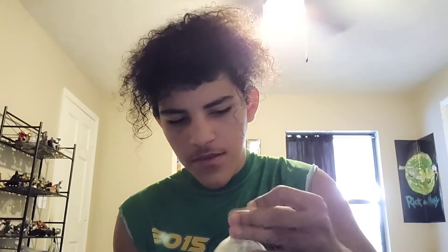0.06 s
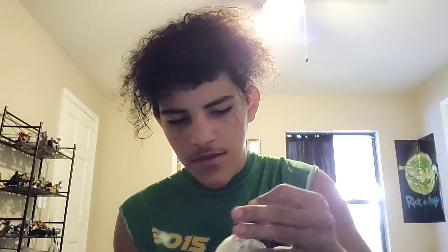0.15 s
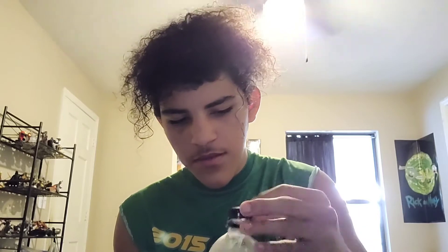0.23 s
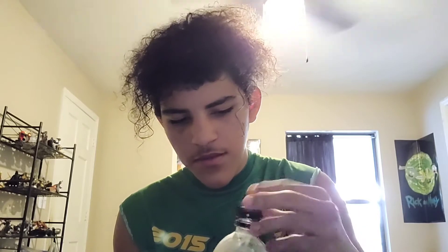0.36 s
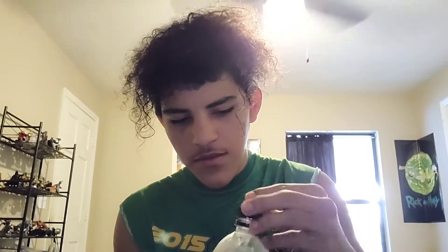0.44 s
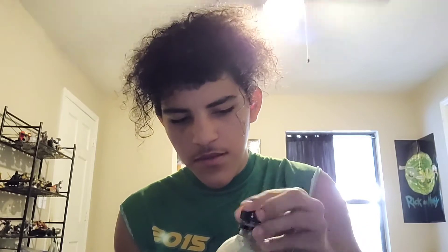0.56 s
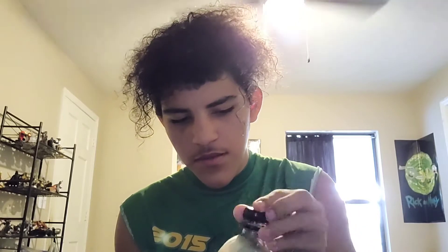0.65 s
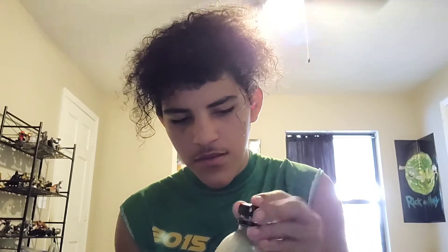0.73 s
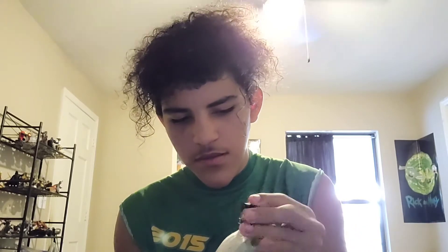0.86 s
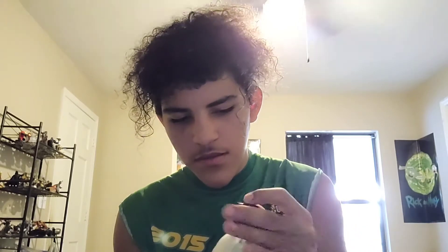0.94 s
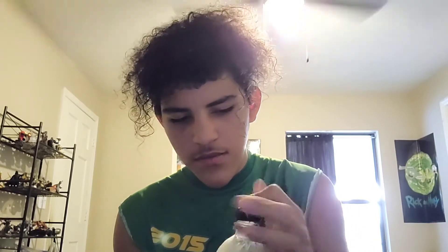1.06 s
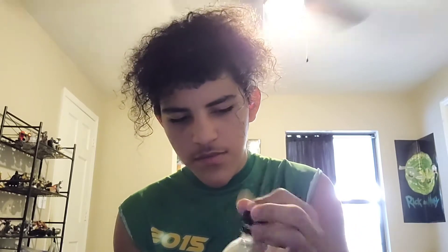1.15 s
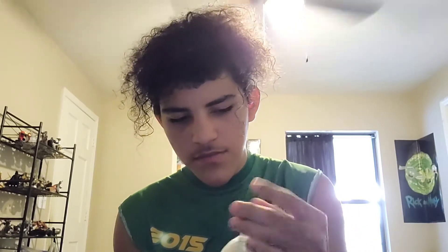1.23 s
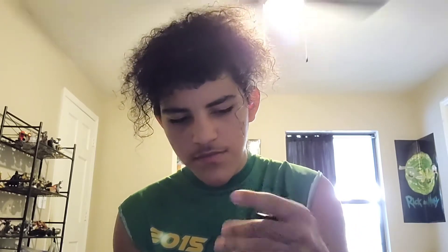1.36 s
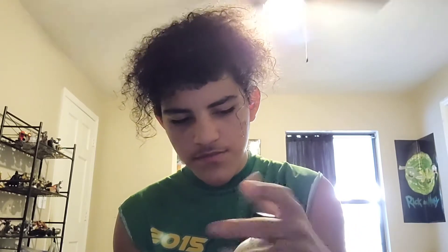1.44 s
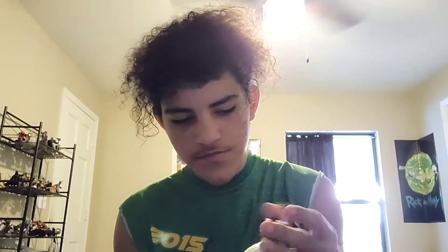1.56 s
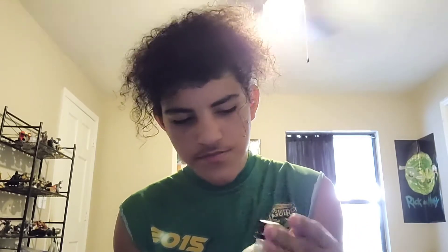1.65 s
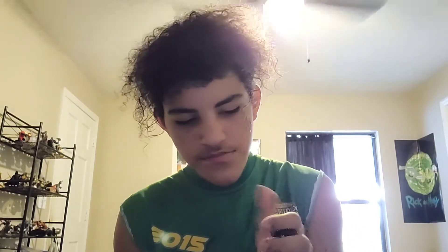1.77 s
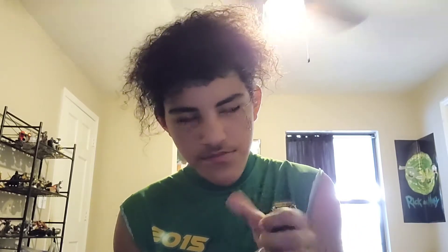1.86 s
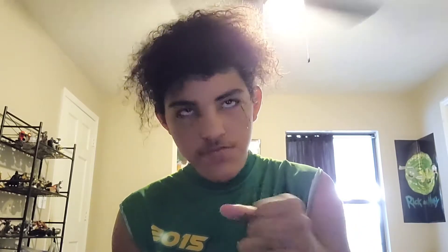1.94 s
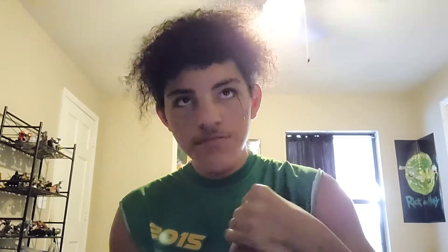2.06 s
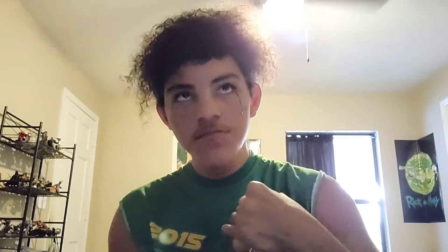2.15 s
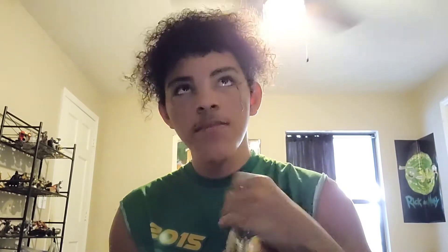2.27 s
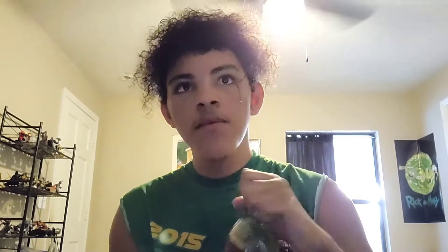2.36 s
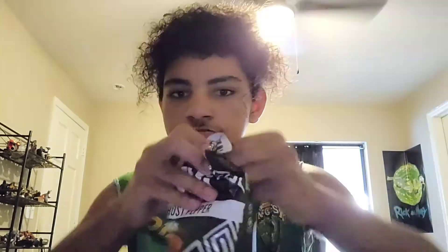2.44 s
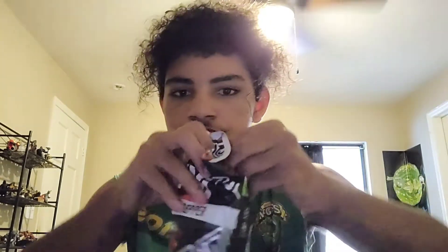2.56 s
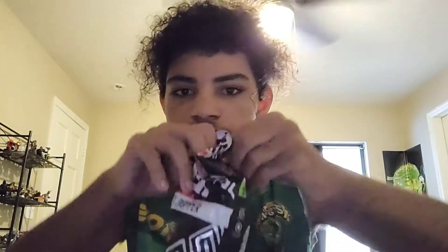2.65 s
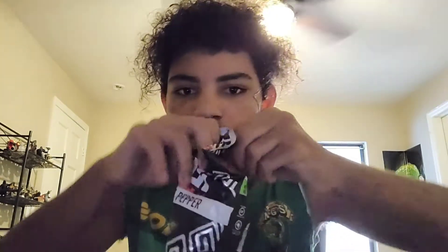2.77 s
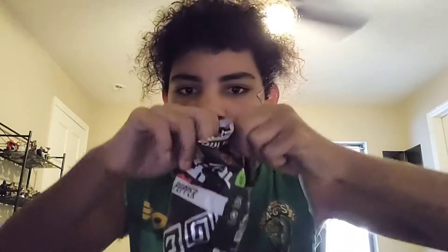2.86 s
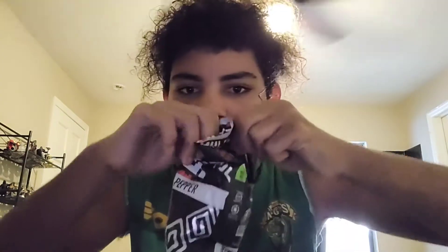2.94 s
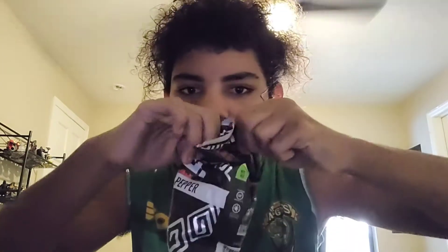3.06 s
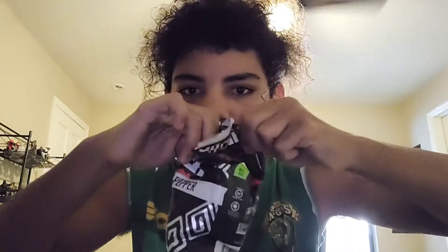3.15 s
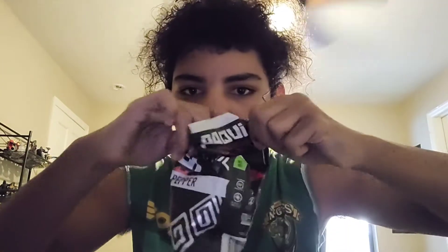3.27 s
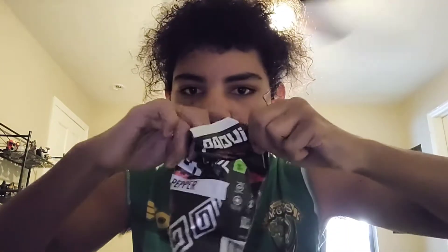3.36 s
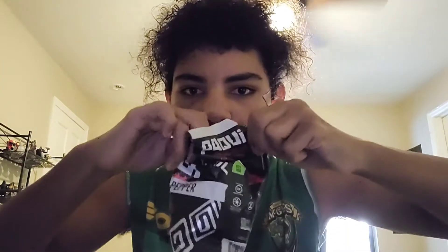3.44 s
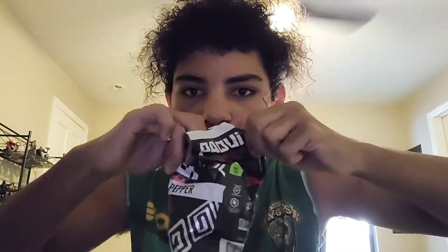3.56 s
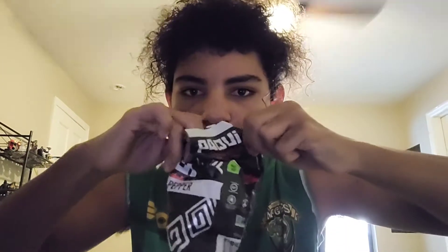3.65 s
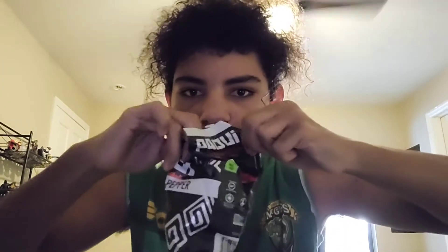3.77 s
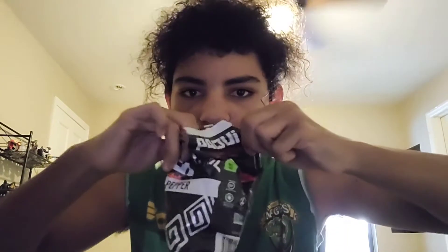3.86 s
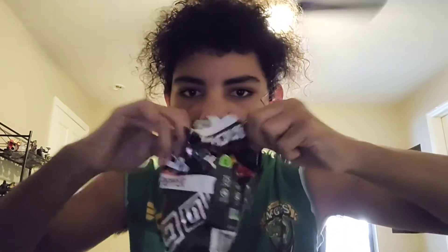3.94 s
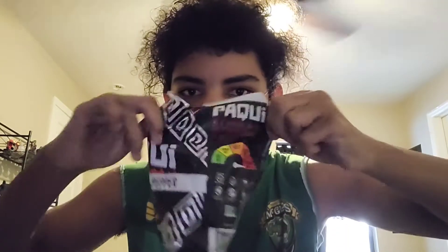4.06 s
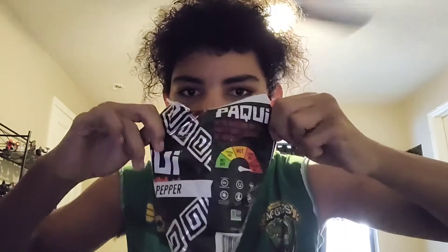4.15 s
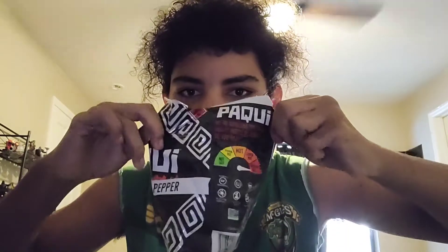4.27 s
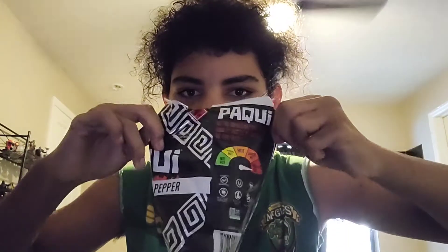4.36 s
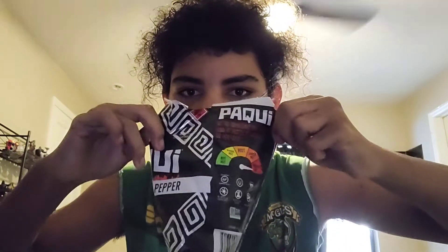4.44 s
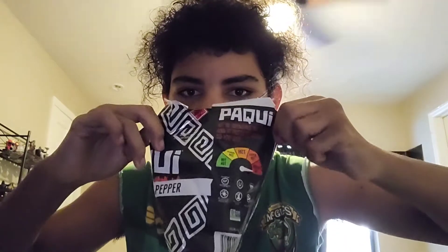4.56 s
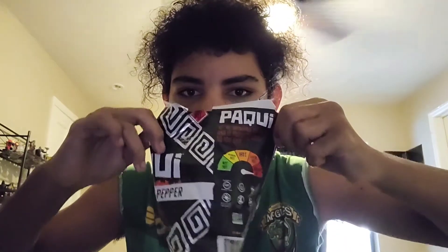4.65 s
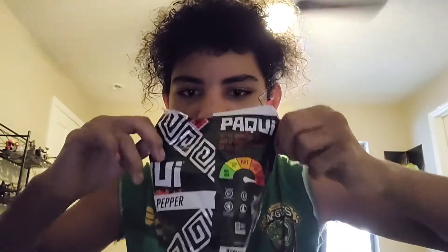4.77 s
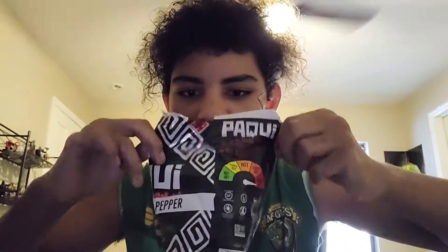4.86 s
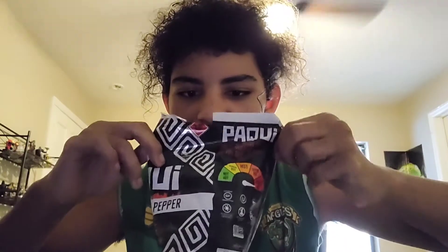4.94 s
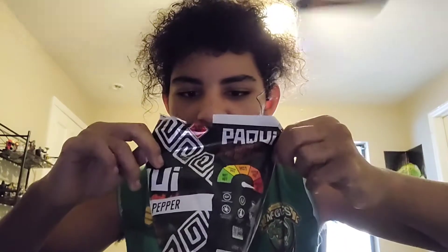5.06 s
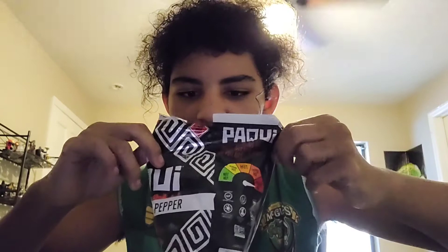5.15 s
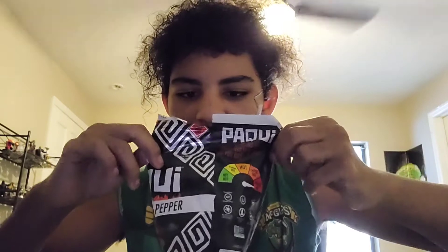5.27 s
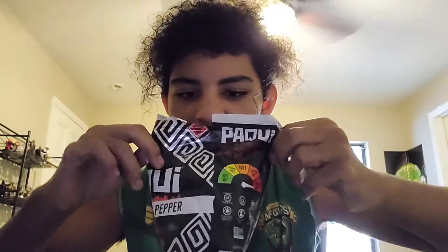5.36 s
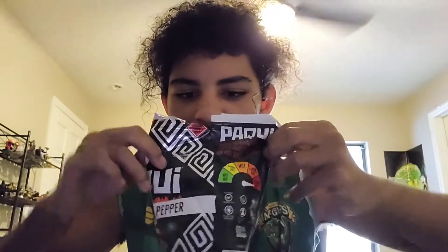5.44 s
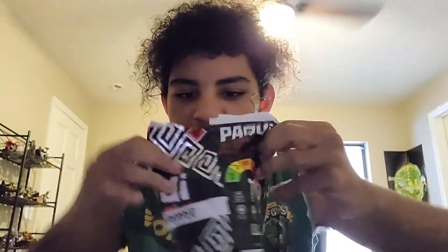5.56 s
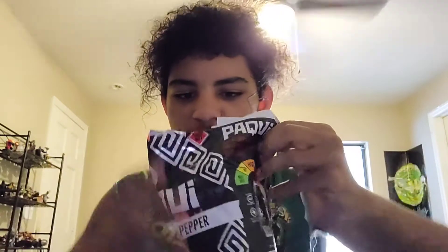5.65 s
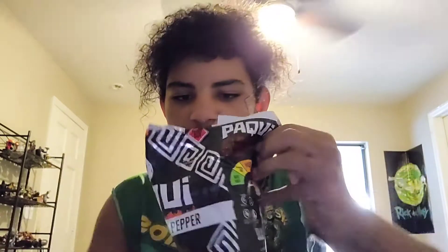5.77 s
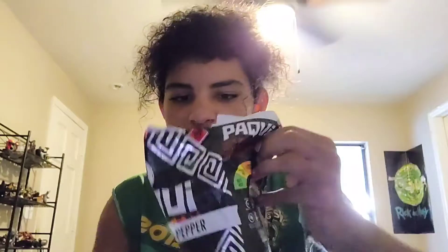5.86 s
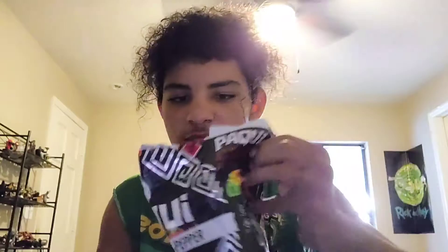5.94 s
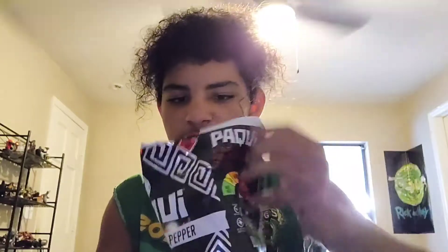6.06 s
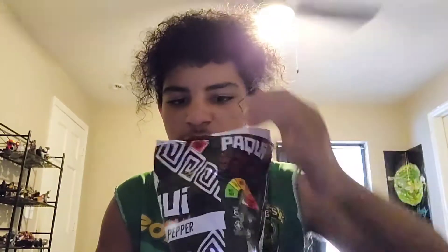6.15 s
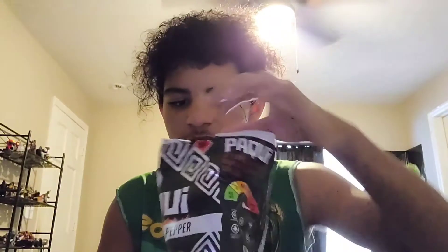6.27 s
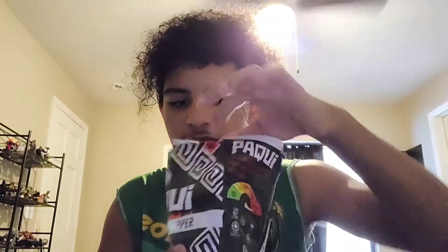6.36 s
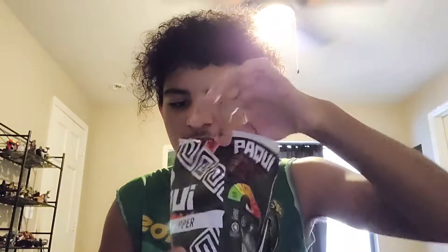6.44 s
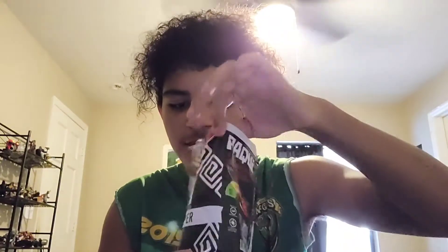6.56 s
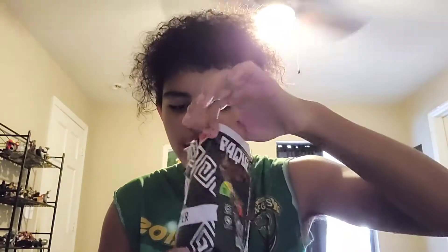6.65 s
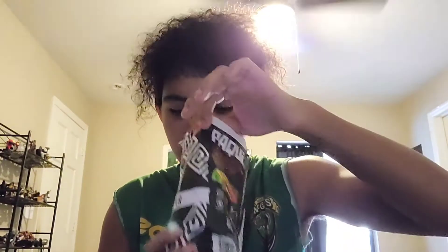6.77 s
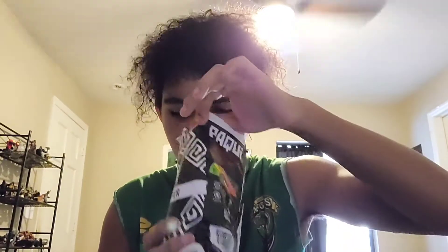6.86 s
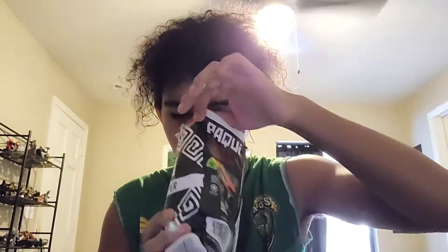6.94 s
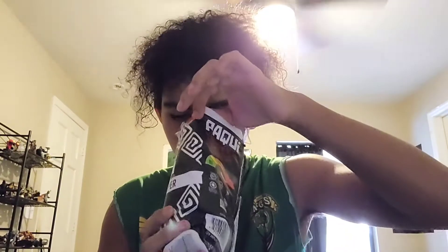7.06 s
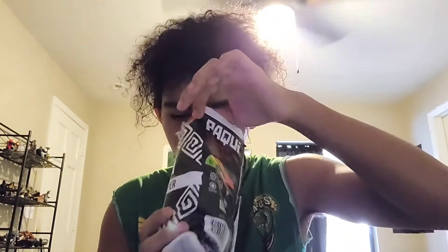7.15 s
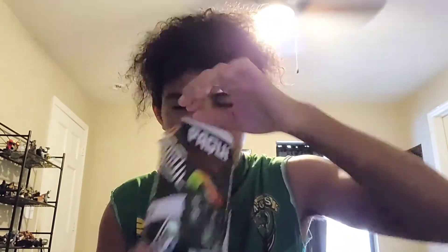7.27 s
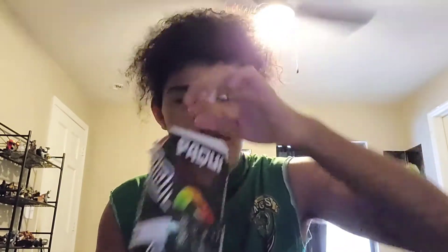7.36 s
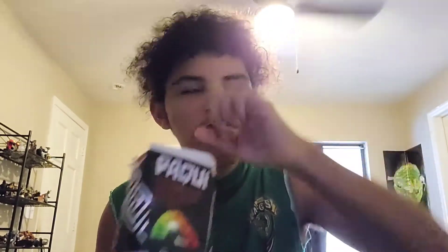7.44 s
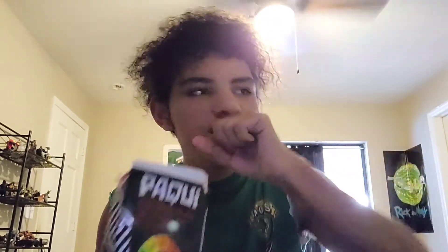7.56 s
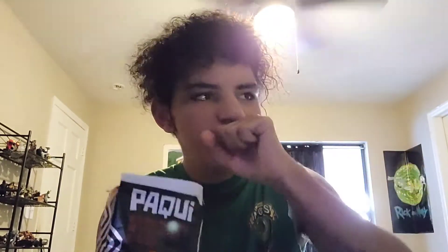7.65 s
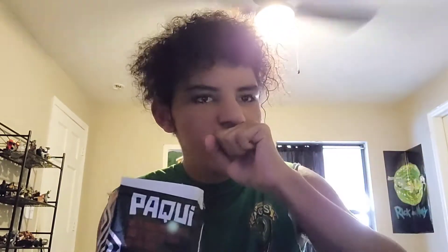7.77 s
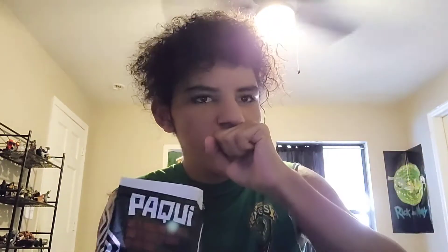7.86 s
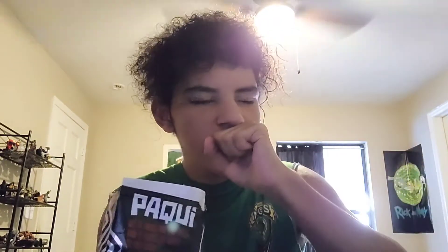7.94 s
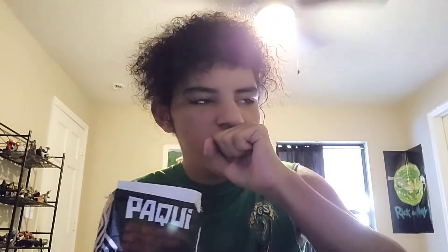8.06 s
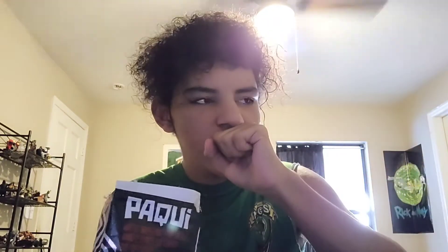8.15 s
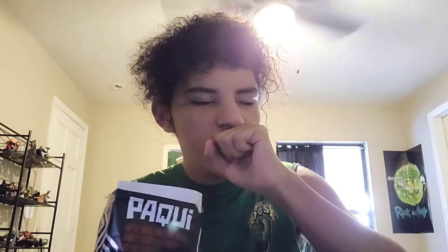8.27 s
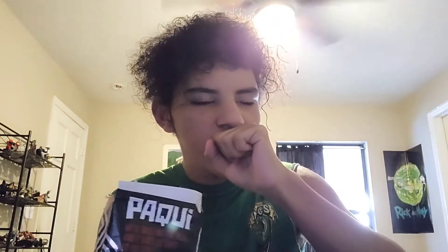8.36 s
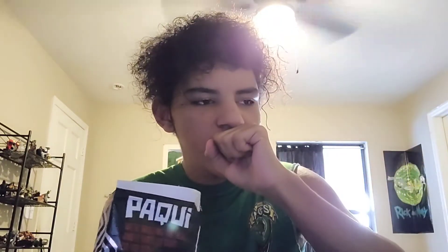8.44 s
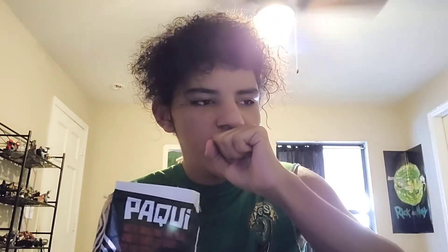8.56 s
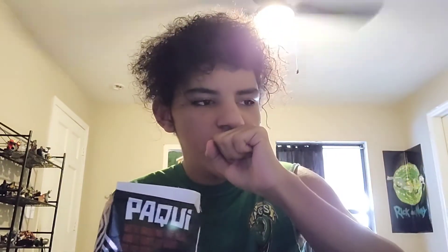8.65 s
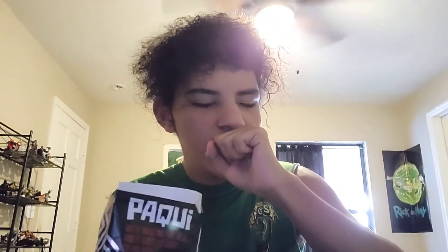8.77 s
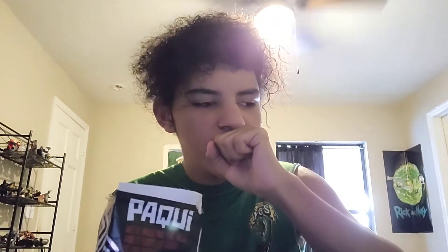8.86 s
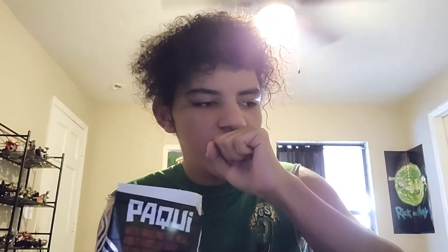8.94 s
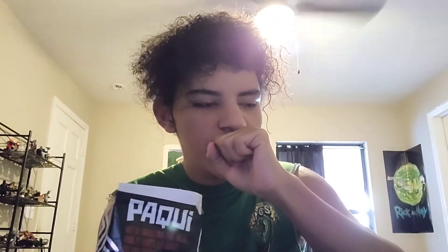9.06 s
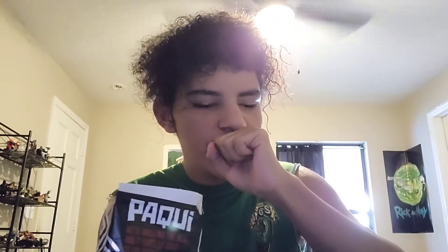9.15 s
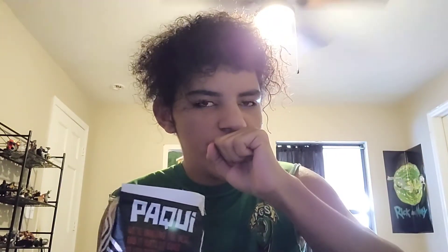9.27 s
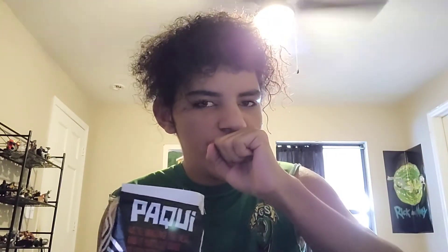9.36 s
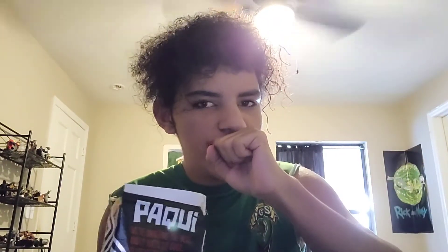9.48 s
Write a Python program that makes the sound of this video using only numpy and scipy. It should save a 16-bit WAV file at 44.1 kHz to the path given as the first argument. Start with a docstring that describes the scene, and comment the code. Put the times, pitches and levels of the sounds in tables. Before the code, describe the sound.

A close stereo pickup in a small bedroom, with short reflections and a quiet, steady ceiling fan whose low hum swells now and then. From 0 to 1.2 seconds come faint finger scuffs and small plastic ticks on a bottle. They strengthen from 1.2 to 1.65, with two sharper clacks near 1.55 and 1.65, then dull soft bumps at about 1.75 and 2.1. At 2.5 a stiff foil bag is gripped: dense, crisp crackles and snapping creases until 3.3. After a short lull with a few snaps, it is pulled open, loudest from 3.95 to 4.2, trailing off by 4.5. Sparse ticks follow, then moderate crinkling from 5.4 to 6.2 and a bright burst around 6.5 as a hand reaches in, easing by 6.9. After 7.2 there is almost only fan air, with isolated tiny film ticks near 8.2 and 9.4.

```python
"""Stiff snack bag opened close to the microphones

A small bottle is handled and put away; then a stiff foil snack bag is gripped, pulled open and rummaged in,
close to a pair of built-in microphones in a bedroom. Creases in the film snap through one by one as clicks with
a brief noisy flutter, over a crinkle of tiny random clicks that follows the hands. The bottle ticks, scuffs and
bumps; behind it all lie reflections of the room and a ceiling fan: shaped noise with a narrow, swelling hum."""
import sys
import numpy as np
from scipy import signal
from scipy.fft import rfft, irfft, next_fast_len
from scipy.io import wavfile
from scipy.ndimage import uniform_filter1d

SR = 44100
rng = np.random.default_rng(int(sys.argv[2]) if len(sys.argv) > 2 else 0)


def file_out(sig):
    """Save sig as 16-bit WAV at sys.argv[1]."""
    # one column per channel
    cols = np.atleast_2d(sig).T
    # limit, then scale
    lim = np.clip(cols, -1, 1)
    pcm = np.round(lim * 32767).astype(np.int16)
    wavfile.write(sys.argv[1], SR, pcm)


N = 419391
LEAD = 400   # samples of creak before a crease gives way
OPPOSITE = np.array([[1], [-1]])   # left and right in opposite sense


def bag():
    """Big creases snap over lesser ones and a crinkle that is louder, its grains denser, the harder the work."""
    # moves of the hands: gripping, tugging at the seal, opening, holding, turning, reaching in, drawing out
    # peak_s, level_db (middle register, before the trim below), rise_s, fall_s,
    # body_db and treble_db (re level)
    moves = [(2.64, -39, 0.12, 0.059, 4.5, -4.5), (2.72, -36, 0.09, 0.12, 0.5, -5),
             (2.899, -49.5, 0.25, 0.23, 12, -1.5), (3.15, -49.5, 0.34, .2, 8.5, -14),
             (3.255, -33, 0.099, 0.049, 4.5, -1.5), (3.53, -52, 0.015, 0.11, -3.5, -14),
             (4.041, -27.5, 0.13, .085, 5.5, -5.5), (4.195, -36.5, 0.023, 0.061, 3.5, -3),
             (4.37, -58, 0.046, .2, 6, -6), (4.73, -69.5, 0.44, 0.55, 12.5, -4),
             (4.899, -45.5, .07, 0.053, 6, -7), (5.522, -36, .03, 0.079, 0, -12),
             (5.579, -41, 0.078, 0.078, 7.5, -4), (5.869, -48, .06, 0.54, 5.5, -9),
             (6.1, -37, 0.26, 0.095, 4, -5.5), (6.411, -51, 0.067, 0.057, 8.5, -11),
             (6.505, -31.5, .035, 0.09, 5, -5.5), (6.71, -52, 0.21, 0.09, 6.5, -11),
             (6.79, -43.5, 0.034, 0.061, -1, -10), (6.9, -67, 0.15, 0.57, 9, 0)]
    # the loudest creases snapping through: start_s, level_db (middle register, before the bass cut and trim),
    # body_db and treble_db (re level)
    big_creases = [(2.5376, -39.5, 1.5, -9), (2.6024, -33, -15, -17), (2.6184, -37.5, 9, 1),
                   (2.6394, -36.5, -14, 6.5), (2.6796, -38, -24, 8.5), (2.7105, -30.5, -2, 4.5),
                   (2.7334, -35, 6, 0), (2.7766, -26.5, -8.5, -9), (2.836, -31.5, -6.5, -9),
                   (2.8915, -33, 0.5, -4.5), (2.9191, -35.5, 5.5, -9), (2.987, -41.5, -21, 9),
                   (3.0102, -37, -5, 3), (3.0445, -28, 3, -10.5), (3.0666, -40, 4, -14),
                   (3.1337, -34.5, -1, -4.5), (3.2276, -30, 11, -6), (3.2528, -25.5, 2.5, -11),
                   (3.2625, -32, 4, 3), (3.2776, -28, -6, -1.5), (3.4146, -56.5, 16, 0),
                   (3.5153, -31, -7, -4), (3.6242, -68.5, 20, -15), (3.799, -49, 11.5, -33),
                   (3.839, -30.5, 8, 4.5), (3.8841, -39.5, 4.5, -3), (3.9465, -20.5, -6, -6),
                   (3.9796, -36, 10, -3), (3.9967, -34, 5, 2), (4.0243, -34.5, 15.5, 4),
                   (4.0431, -35, 6, 6), (4.0826, -25.5, 0, -4.5), (4.1293, -33, 4.5, -5),
                   (4.174, -42.5, 4, 2), (4.1948, -30.5, 4.5, -11), (4.2213, -38.5, 0, -8),
                   (4.2553, -41.5, -2, -21), (4.2872, -48.5, 8.5, -18), (4.3239, -47, 2, -16),
                   (4.3542, -34, 8, -12), (4.4185, -49.5, 3.5, -10), (4.45, -52.5, 2, -25),
                   (4.5725, -72.5, 27.5, 5), (4.6986, -64.5, 17, -10), (4.8312, -55.5, 0, 4.5),
                   (4.8528, -42.5, 1, -10), (4.8963, -37, 12, 6), (4.9154, -46, 16, -8),
                   (4.9861, -47, -14, -7), (5.0014, -52.5, 9.5, -13), (5.165, -57, 13.5, -1),
                   (5.2688, -47.5, -3.5, -7), (5.3929, -49.5, -4, -15), (5.403, -50.5, -2, -4.5),
                   (5.4412, -45, -3.5, -1), (5.5116, -44.5, 7, -3), (5.5517, -43, 9, 1.5),
                   (5.585, -40, 10.5, 4), (5.642, -40, -8, -3), (5.6882, -37, 0.5, 0.5),
                   (5.8201, -48.5, 2, -28), (5.8438, -36.5, 5, -8), (5.8867, -33.5, -2, -3),
                   (5.9308, -35, -12, -34), (6.0591, -37, -15, 0.5), (6.1052, -38.5, 6, 5),
                   (6.3119, -56, 8, -13), (6.412, -42, 9, -5), (6.4402, -34.5, 1, -2.5),
                   (6.494, -25.5, 1, -9.5), (6.5169, -31.5, 9.5, -2), (6.5599, -39, 12, -2.5),
                   (6.6893, -43.5, 1, -34), (6.7045, -47, -5, -18), (6.7268, -44.5, 8.5, -20),
                   (6.7825, -38.5, 8.5, -3), (6.8824, -55.5, 11.5, 1.5), (6.9185, -51, 11.5, -28.5),
                   (7.2097, -46, 10, -7), (7.6909, -71, -0.5, 7), (8.18, -56.5, -4, -2),
                   (9.3924, -55, 4, -9.5)]
    # what the film radiates: frequency_hz, level_db (per Hz, relative)
    film_spectrum = [(50, -25.5), (110, -17.5), (360, -18), (560, -24.5), (780, -17.5), (1000, -12.5),
                     (1400, -21.5), (2100, -16.5), (3000, -22), (5500, -29), (8250, -29.5), (8800, -38.5),
                     (14500, -40), (16500, -58)]

    power = 0
    for peak_s, db, rise_s, fall_s, body_db, treble_db in moves:
        balance = from_db([body_db, 0, treble_db])
        power = power + np.outer(balance, gesture(peak_s, db, rise_s, fall_s)) ** 2
    body, middle, treble = np.sqrt(power)

    # the harder the film is worked, the more fine creases buckle
    effort = np.sqrt(middle / middle.max())
    fine = grains(film_spectrum, per_s=70 + 600 * effort, spread_db=0.5, flutter_s=0.0021, flutter_db=-15)
    lesser = grains(film_spectrum, per_s=50, spread_db=2, flutter_s=0.0023, flutter_db=-15)
    film = registers(rms_one(fine) + from_db(-3) * rms_one(lesser))
    crinkle = sum(rms_one(part) * gain for part, gain in zip(film, (body, middle, treble)))

    creases = snaps(big_creases, film_spectrum, flutter_s=.0022, flutter_db=-10)
    # a single facet is too small to radiate much bass
    creases = butter(creases, 340, "high", order=1)

    # the whole bag flexes under the hands with a soft, low crumple
    folds = grains(film_spectrum, per_s=400, spread_db=1, flutter_s=0.0028, flutter_db=-13, count=3)
    flex = from_db(-14) * body * rms_one(butter(folds, 520, "low", order=4))
    return from_db(-2) * crinkle + flex + from_db(-1) * creases


def gesture(peak_s, db, rise_s, fall_s):
    """Gain of one hand movement: it climbs evenly in dB to its peak and dies away again."""
    range_db = 20   # rise and fall are the times taken to cover this range
    t = np.arange(N) / SR - peak_s
    return from_db(db - range_db * np.minimum(np.maximum(-t / rise_s, t / fall_s), 10))


def snaps(rows, spectrum, flutter_s, flutter_db):
    """Each listed snap has its own flutter and its own balance of body and treble."""
    out = np.zeros((2, N + SR))
    span = int(.009 * SR)   # levels are rms over 9 ms
    lengths = flutter_s * np.exp(.3 * rng.standard_normal(len(rows)))
    clicks = np.array([snap(spectrum, length, flutter_db) for length in lengths])
    parts = np.array(registers(clicks))   # register, snap, port, sample
    parts /= np.sqrt(np.mean(parts[..., LEAD:LEAD + span] ** 2, axis=(2, 3), keepdims=True))
    for k, (start_s, db, body_db, treble_db) in enumerate(rows):
        at = max(int(start_s * SR) - LEAD, 0)
        gains = from_db(db + np.array([body_db, 0, treble_db]))
        out[:, at:at + parts.shape[-1]] += np.tensordot(gains, parts[:, k], 1)
    return out[:, :N]


def grains(spectrum, per_s, spread_db, flutter_s, flutter_db, count=14):
    """Tiny bucklings of uneven size, dealt to a few facets that each sound their own way."""
    born = rng.random(N) < per_s / SR
    sizes = from_db(spread_db * np.minimum(rng.exponential(1, N), 4))
    clicks = born * sizes * rng.choice([-1, 1], N)
    # the hands supply energy steadily, however it is shared among the grains (averaged over 50 ms)
    clicks = clicks / np.sqrt(np.abs(uniform_filter1d(clicks ** 2, size=2200)) + 0.0008)
    facet = rng.integers(0, count, N)
    sound = 0
    for k in range(count):
        voice = rms_one(snap(spectrum, flutter_s, flutter_db))
        sound = sound + signal.oaconvolve((clicks * (facet == k))[None], voice, axes=1)
    return sound[:, LEAD:LEAD + N]


def snap(spectrum, flutter_s, flutter_db, creak_db=-16, near_db=-24, size=2048):
    """One buckling: a short creak, a sharp crack, the flutter of the facet, then scatter off hands and desk."""
    t = (np.arange(size) - LEAD) / SR
    creak = from_db(creak_db) * np.exp(-abs(t) / .003)
    after = np.exp(-abs(t) / flutter_s) + from_db(near_db) * np.exp(-abs(t) / .008)
    # the crease gives way in uneven jerks
    jerks = np.repeat(from_db(3 * rng.standard_normal(size // 32)), 32)
    flutter = rng.standard_normal((2, size)) * np.where(t < 0, creak, after) * jerks
    # long waves reach both ports alike, short ones do not
    apart = butter(flutter[1], 1550, "high", order=3)
    push = from_db(flutter_db) * (flutter[0] + 1.05 * apart * OPPOSITE)
    push[:, LEAD] += rng.choice([-1, 1])   # the crack
    response = microphone(spectrum, ripple_db=4.4)
    left, right = signal.fftconvolve(push, response, axes=1)[:, :size]
    # the left port is a little nearer: 5 samples
    return np.array([left, np.roll(right, 5)])


def microphone(spectrum, ripple_db=0, size=2048):
    """Causal stereo response to a click of this spectrum, coloured by a random facet and by the housing."""
    # resonances of the microphone housing: centre_hz, width_hz, boost_db (its sign is ignored)
    housing = [(1100, 87, 14.5), (1495, 38.6, 3.5), (1832, 51, 8), (2526, 80, 7), (3188, 110, 7.5),
               (3860, 69, -2.5), (4770, 63, 7)]
    # left minus right at the ports: frequency_hz, difference_db
    port_difference = [(280, 1), (520, -7.5), (800, 0.5), (1080, -3), (1300, -7), (2200, -3.5), (4500, 0.5),
                       (6000, -1), (7600, 8), (10000, -1)]

    hz = np.arange(size // 2 + 1) * SR / size
    facet_hz = np.geomspace(300, 16000, 30)
    # long waves do not feel the shape of a facet
    felt = np.minimum(facet_hz / 1200, 1)
    facet = np.column_stack([facet_hz, ripple_db * felt * rng.standard_normal(len(facet_hz))])
    db = at_hz(spectrum, hz) + at_hz(facet, hz) + at_hz(port_difference, hz) * OPPOSITE / 2
    for centre, width, boost_db in housing:
        extra_power = from_db(abs(boost_db)) ** 2 - 1
        db = db + 10 * np.log10(1 + extra_power / (1 + (2 * (hz - centre) / width) ** 2))
    # minimum phase: nothing sounds before the click
    cepstrum = irfft(np.log(from_db(db)))
    cepstrum[:, 1:size // 2] *= 2
    cepstrum[:, size // 2 + 1:] = 0
    return irfft(np.exp(rfft(cepstrum)))


def bottle():
    """Fingers and cap tick as short snaps, and the fingers scuff over the plastic as a stream of grains."""
    # fingers sliding on the bottle, then reaching for the bag; before the trim below
    # peak_s, level_db, rise_s, fall_s
    strokes = [(0.02, -57.5, 0.076, 0.13), (0.59, -56.5, 0.035, .15), (0.87, -64.5, 0.22, 0.34),
               (1.34, -50, 0.15, 0.11), (1.54, -53.5, 0.095, 0.094), (1.636, -36.5, 0.026, 0.03),
               (2.31, -59, 0.3, 0.14)]
    # ticks of fingers and cap: start_s, level_db (middle register, before the trim below),
    # body_db and treble_db (re level)
    tick_rows = [(0.1936, -62, 4, -6), (0.2471, -64, 3, -11), (0.5616, -50.5, -5, -11),
                 (0.5927, -54, -3, -27), (0.7953, -52, 3, -11), (0.8917, -63, 5.5, -23),
                 (1.0072, -64, 4, -14), (1.0807, -60.5, -2, -7), (1.2422, -44, -7.5, -21),
                 (1.3411, -46, -22, -16), (1.3997, -53, 2.5, -23), (1.4662, -47.5, -9, -20),
                 (1.5256, -44, -14, -18), (1.5417, -34.5, -2, -13), (1.6412, -34.5, -11, -12)]
    # what the bottle radiates: frequency_hz, level_db (per Hz, relative)
    bottle_spectrum = [(100, -16), (210, -2), (400, -25), (600, -21), (950, -8), (1400, -16.5),
                       (2000, -11.5), (3300, -16), (4600, -24.5), (8000, -31.5), (9000, -42.5),
                       (16000, -42.5)]

    level = sum(gesture(*stroke) for stroke in strokes)
    scuff = rms_one(grains(bottle_spectrum, per_s=220, spread_db=1.5, flutter_s=0.0025, flutter_db=-17.5))
    ticks = snaps(tick_rows, bottle_spectrum, flutter_s=0.0069, flutter_db=-15)
    return from_db(1) * (level * scuff + ticks)


def bumps():
    """Soft contacts ring only a few low modes."""
    # the bottle handled and put down: start_s, level_db (gain on the ring)
    contacts = [(1.345, -49), (1.474, -48), (1.758, -40), (2.117, -44), (2.13, -51.5)]
    # their dull ring: frequency_hz, level_db (relative), t60_s
    modes = [(178, -1.5, 0.16), (255, 4.5, 0.11), (297, 1.5, 0.1)]

    out = np.zeros(N)
    t = np.arange(SR // 4) / SR
    ring = sum(from_db(db - 60 * t / t60) * np.sin(2 * np.pi * hz * t) for hz, db, t60 in modes)
    ring = ring * (1 - np.exp(-t / 0.0036))   # soft onset
    for start_s, db in contacts:
        at = int(start_s * SR)
        out[at:at + len(t)] += from_db(db) * ring
    return out


def bedroom(x, t60s=(.46, .38, .3), wet_db=(-15, -12.5, -12.5), build_s=0.00043):
    """Separate reflections thicken into a tail that dies sooner in the treble."""
    t = np.arange(int(.6 * SR)) / SR
    # share of samples that carry a reflection
    share = np.minimum(.01 + (t / .2) ** 2, 1)
    mid, side = rng.standard_normal((2, len(t))) * (rng.random((2, len(t))) < share) / np.sqrt(share)
    white = mid + butter(side, 1200, "high") * OPPOSITE
    tail = 0
    for part, t60, db in zip(registers(white), t60s, wet_db):
        fade = from_db(-60 * t / t60) * (1 - np.exp(-(t / build_s) ** 2))
        tail = tail + from_db(db) * part * fade / np.sqrt(2 * np.sum(fade ** 2))
    return signal.oaconvolve(x, tail, axes=1)[:, :N]


def fan():
    """Steady moving air as shaped noise, and the narrow hum of the motor."""
    # fan and room air: frequency_hz, level_db (per Hz, relative)
    air_spectrum = [(25, -15), (45, -3), (110, -4), (160, -8), (225, -5), (380, -17), (500, -15),
                    (590, -27), (1050, -18), (2000, -28), (3300, -40), (5200, -45), (7800, -42),
                    (8900, -54), (16000, -53)]
    # left-right likeness of the air: frequency_hz, likeness (0-1)
    air_likeness = [(180, .98), (400, 0.83), (900, 0), (1650, 0), (5000, 0.01)]
    # narrow bands of hum: centre_hz, width_hz (between half-amplitude points), level_db (rms before swells)
    hum = [(44.56, 4.7, -64), (91.13, 6.17, -61.5), (220, 23, -68), (329, 9.9, -72)]
    # the hum near 91 Hz swells now and then: peak_s, boost_db (over its usual level)
    swells = [(0.03, 10), (1.5, 11), (2.56, 5), (3.0, 7.5), (4.52, 16.5), (6.06, 8), (6.9, 8.5),
              (8.481, 10.5), (9.46, 7.5)]

    size = next_fast_len(N)
    hz = np.arange(size // 2 + 1) * SR / size
    mid, side, motor = rfft(rng.standard_normal((3, size)))
    alike = np.clip(at_hz(air_likeness, hz), 0, .995)
    stereo = mid + np.sqrt((1 - alike) / (1 + alike)) * side * OPPOSITE
    air = rms_one(irfft(from_db(at_hz(air_spectrum, hz)) * stereo, size)[:, :N])

    lines = []
    for centre, width, db in hum:
        band = irfft(motor / (1 + (2 * (hz - centre) / width) ** 2), size)[:N]
        lines.append(from_db(db) * rms_one(band))
    t = np.arange(N) / SR
    swell_width_s = .09
    swell_db = sum(db * np.exp(-((t - peak_s) / swell_width_s) ** 2) for peak_s, db in swells)
    lines[1] = lines[1] * from_db(swell_db)
    return from_db(-58.5) * air + sum(lines)


def registers(x):
    """Split into body, middle and treble."""
    body_hz, treble_hz = 1500, 4500
    return [butter(x, body_hz, "low", order=4),
            butter(x, [body_hz, treble_hz], "band", order=4),
            butter(x, treble_hz, "high", order=4)]


def butter(x, hz, kind, order=2):
    """Causal Butterworth filter."""
    return signal.sosfilt(signal.butter(order, hz, kind, fs=SR, output="sos"), x)


def at_hz(points, hz):
    """Read a table on a log-frequency axis."""
    f, value = np.transpose(points)
    return np.interp(np.log(np.maximum(hz, 1)), np.log(f), value)


def from_db(db):
    """Decibels to gain."""
    return 10 ** (np.asarray(db) / 20)


def rms_one(x):
    """Scale to unit power."""
    return x / np.sqrt(np.mean(x ** 2) + 1e-20)


def scene():
    """Hands at work in front of the microphones, the room and the fan behind."""
    near = bag() + bottle() + bumps()
    return near + bedroom(near) + fan()


def record(dry):
    """A steep elliptic low-pass cuts the top above 16.1 kHz."""
    return signal.sosfilt(signal.ellip(10, .1, 80, 16100, fs=SR, output="sos"), dry)


dry = scene()
out = record(dry)
file_out(out)
```